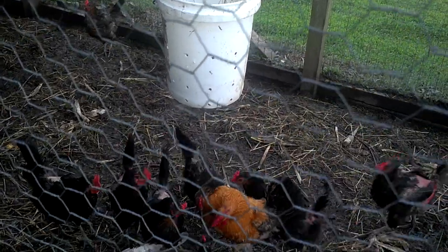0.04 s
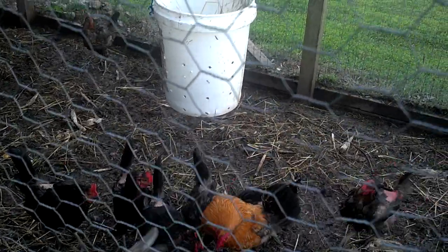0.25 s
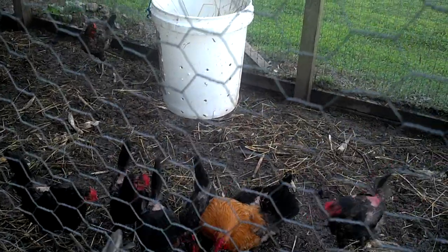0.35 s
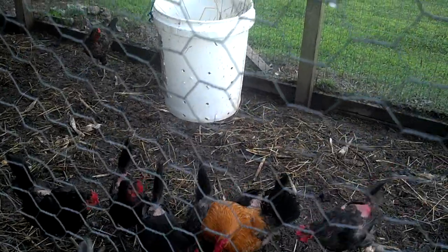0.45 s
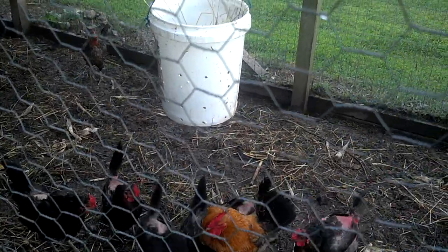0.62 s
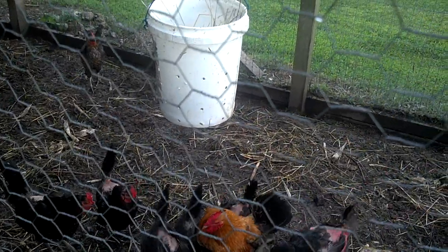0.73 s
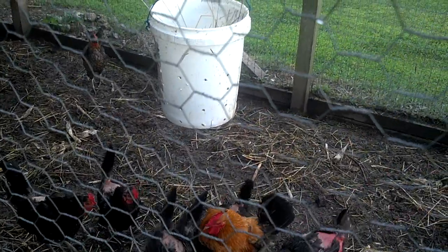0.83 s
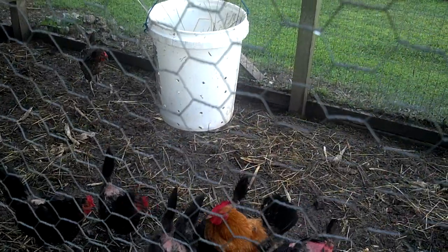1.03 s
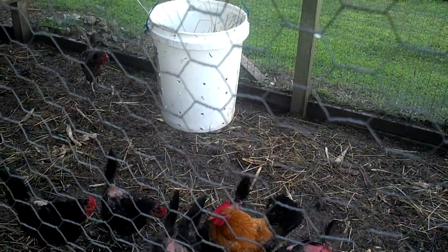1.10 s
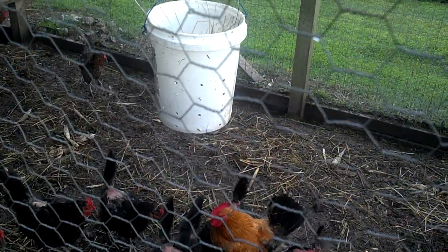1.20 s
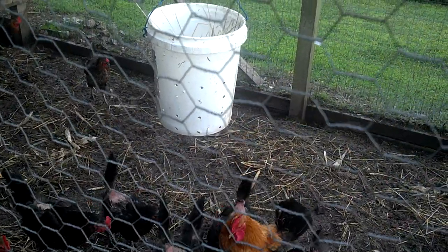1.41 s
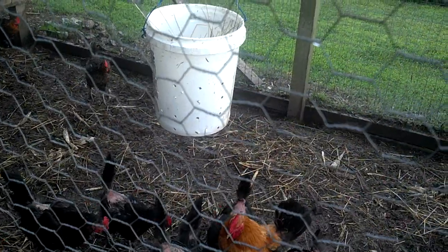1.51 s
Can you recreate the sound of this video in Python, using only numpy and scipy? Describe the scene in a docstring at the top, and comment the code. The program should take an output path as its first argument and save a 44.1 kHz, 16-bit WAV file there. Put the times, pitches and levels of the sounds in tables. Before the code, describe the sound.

Close hen clucks, brief and hoarse, with pecks, bird chirps and constant patchy outdoor noise

```python
"""Hens forage in an outdoor wire run close by, over an outdoor rush of patchy noise that never stops.
From the start: faint hoarse calls of further hens (banded noise), short swells of treble hiss (dense random
grains), pecks (noise puffs). From 0.23 s: six clucks (overtones through a beak resonance) and a bird's falling
whistles (gliding sines). At 0.64 and 1.27 s: another bird's rising chips with echoes; at 0.84 s: two soft
knocks (ringing modes). Two microphone ports hear it all; each channel is its port minus the delayed other."""
import sys
import numpy as np
from scipy import signal
from scipy.fft import rfft, irfft, next_fast_len
from scipy.io import wavfile
from scipy.ndimage import uniform_filter1d, map_coordinates

SR = 44100
rng = np.random.default_rng(int(sys.argv[2]) if len(sys.argv) > 2 else 0)


def wav_out(sig):
    """Save sig, one row per channel (or a flat mono array), as 16-bit PCM at SR to the path in sys.argv[1]."""
    wavfile.write(sys.argv[1], SR, np.round(np.clip(np.atleast_2d(sig).T, -1, 1) * 32767).astype(np.int16))


N = 68355
T = np.arange(SR // 3) / SR  # time within one event, s

# levels are set at the ports, ahead of record()
TREBLE_HZ, PATCHY_DB = 5000, 2
SWELL_S, FADE_S, FALL_FLUTTER_DB, FALL_LEAD_MS = 0.0072, .0085, 2.2, -0.051
LEAD_IN_DB, LEAD_IN_S = -15, 0.029  # a faint higher start
RISE_S, RISE_EDGE_S, RISE_FLUTTER_DB, RISE_FADE_DB_PER_S = 0.0065, .0015, 4, 600
SLAP_S, SLAP_DB = .0065, -9  # one near echo of each chip
ECHO_DB, ECHO_T60_S = -3, .21  # scattered echoes of the birds
YARD_DB, YARD_T60_S, APART_HZ = -13, 0.051, 1080  # scattered echoes of the clucks; ports differ above APART_HZ
GRAINS_PER_S, GRAIN_SCATTER_DB = 6000, 1.5
SKIRT_DB, SKIRT_HZ = -9, 5000  # bright pecks spread over all the treble
KNOCK_RISE_S, KNOCK_LEAD_MS = .002, -.24
ATTACK_S, RELEASE_T60_S = .0012, .017
SAG_PER_S = 0.98  # share of the pitch
JITTER, SHIMMER_DB = .01, 1.2
BEAK_WIDTH_HZ, HOARSE_OCTAVES = 130, 1.52
CLOSED_BOOST = 0.76  # extra fundamental while the beak is shut
RASP_HZ, RASP_OCTAVES = 7000, 1.2
TRAIL_HZ, TRAIL_OCTAVES, TRAIL_S = 729, 0.22, 0.023  # hoarse trail after a cluck
PORT_DELAY_S, BASS_LIFT_HZ, RUMBLE_CUT_HZ, TOP_HZ = 16 / 44100, 400, 78, 15750
OVERLOAD, OVERLOAD_KNEE = 0.43, 2.8  # level where a channel rounds off, and how suddenly


def amp(db):
    """Amplitude factor of a level in dB."""
    return 10 ** (np.asarray(db) / 20)


def unit(x):
    """x scaled to RMS 1."""
    return x / np.sqrt(np.mean(x ** 2) + 1e-20)


def noise():
    """White noise as long as T."""
    return rng.standard_normal(len(T))


def blank():
    """Silence at both ports, with room for event tails."""
    return np.zeros((2, N + SR))


def hump(t, length_s):
    """A half-sine swell from 0 to length_s."""
    return np.sin(np.pi * np.clip(t / length_s, 0, 1))


def filtered(x, response):
    """x times a complex response of frequency."""
    n = x.shape[-1]
    m = next_fast_len(n + 4096)
    return irfft(rfft(x, m) * response(np.fft.rfftfreq(m, 1 / SR) + 1e-3), m)[..., :n]


def band(hz, octaves):
    """A bell-shaped band on a log axis."""
    return lambda f: np.exp(-.5 * (np.log2(f / hz) / max(octaves / 2, .01)) ** 2)


def wobble(rate_hz):
    """A smooth random curve as long as T."""
    return map_coordinates(rng.standard_normal(int(rate_hz / 3) + 4), [T * rate_hz])


def add(ports, s, x, lead_ms=0):
    """Lays a sound at s; a mono one reaches the left port lead_ms before the right."""
    def lag(f):
        delay_s = (s * SR % 1 + 64) / SR + lead_ms / 2000 * np.array([[-1], [1]])
        return np.exp(-2j * np.pi * f * delay_s)
    ports[:, int(s * SR) - 64:][:, :len(T)] += filtered(x, lag) if x.ndim == 1 else x


def yard(ports, t60_s):
    """Scattered decaying echoes of energy near 1, alike at both ports in the bass."""
    common, apart = rng.standard_normal((2, len(T))) * amp(-60 * T / t60_s) * (T > .004)
    apart = filtered(apart, lambda f: 1j * f / (APART_HZ + 1j * f))
    tail = np.array([common + apart, common - apart]) / np.linalg.norm(common)
    return signal.fftconvolve(ports.mean(0)[None], tail, axes=1)[:, :ports.shape[1]]


def rush():
    """Patchy noise, part shared by the ports and part opposite in them; its treble level drifts."""
    # rush shared by both ports: f/Hz, density/dB per Hz
    shared_rush = [(45, -76), (86, -75), (130, -68), (250, -71.5), (500, -75.5), (800, -72.5),
                   (1100, -78.5), (1600, -77.5), (2100, -85), (3300, -91), (4600, -96), (6200, -96.5),
                   (7600, -101.5), (9000, -102.9), (12000, -102.3), (15500, -99.9)]
    # rush that differs between the ports: f/Hz, density/dB per Hz
    split_rush = [(45, -104.1), (86, -89.5), (130, -87.5), (250, -82), (500, -83), (800, -82), (1100, -76),
                  (1600, -78), (2100, -83.5), (3300, -92), (4600, -95), (6200, -95.5), (7600, -99.1),
                  (9000, -100.9), (12000, -102.6), (15500, -102.4)]
    # treble hiss: t/s, level/dB (only the offset from the mean counts)
    treble = [(0.0, -68), (0.15, -60), (0.276, -62.5), (0.616, -64), (0.824, -62.5), (1.082, -65.5),
              (1.55, -64)]

    z = signal.stft(rng.standard_normal((2, N + 512)), nperseg=512)[2]
    field = uniform_filter1d(rng.standard_normal(z.shape[1:]), size=8, axis=0)
    field = uniform_filter1d(field, size=8, axis=1)
    pair = unit(signal.istft(z * amp(PATCHY_DB * unit(field)), nperseg=512)[1][:, :N])

    def read(rows, f):
        hz, db = np.transpose(rows)
        return amp(np.interp(np.log(f), np.log(hz), db))

    colours = lambda f: np.array([read(shared_rush, f), read(split_rush, f)])
    common, apart = np.sqrt(SR / 2) * filtered(pair, colours)
    ports = np.array([common + apart, common - apart])
    high = filtered(ports, lambda f: 1 / (1 + (TREBLE_HZ / f) ** 4))
    db = np.interp(np.arange(N) / SR, *np.transpose(treble))
    return ports + (amp(db - db.mean()) - 1) * high


def hiss_swells():
    """Short swells of banded treble hiss, made of dense random grains."""
    # t/s, length/s, level/dB, f/Hz, width/octaves
    swells = [(0.076, 0.095, -57.5, 11100, 1), (0.225, 0.0096, -59, 11000, 1),
              (0.286, 0.092, -54.5, 13000, 0.84), (0.299, 0.084, -55.5, 7000, 0.45),
              (0.333, 0.037, -49.5, 5330, 0.57), (0.492, 0.045, -55.5, 7700, 1),
              (0.86, 0.063, -51.5, 12670, 0.47), (0.583, .03, -52, 11700, 0.067),
              (0.692, 0.07, -59.5, 7000, 0.34), (0.917, 0.049, -47.5, 7000, 0.74),
              (0.987, 0.043, -58, 7000, .5)]
    out, size = blank(), (2, len(T))
    for s, length_s, db, hz, octaves in swells:
        hits = rng.random(size) < GRAINS_PER_S / SR
        scatter = amp(GRAIN_SCATTER_DB * rng.exponential(size=size))
        grains = hits * rng.standard_normal(size) * scatter
        add(out, s, amp(db) * unit(filtered(grains, band(hz, octaves))) * hump(T, length_s))
    return out


def far_calls():
    """Faint hoarse calls of hens further off: banded noise under a swell."""
    # t/s, length/s, f/Hz, width/Hz, level/dB
    calls = [(.06, 0.035, 185, 40, -43.5), (0.608, 0.092, 870, 120, -43), (0.836, 0.13, 1600, 322, -42),
             (.88, 0.035, 2130, 260, -47), (1.021, 0.063, 1530, 300, -51), (1.289, 0.057, 724, 102, -44),
             (1.417, 0.062, 840, 120, -49)]
    out = blank()
    for s, length_s, hz, width_hz, db in calls:
        hoarse = filtered(noise(), lambda f: np.exp(-2 * ((f - hz) / width_hz) ** 2))
        add(out, s, amp(db) * unit(hoarse) * hump(T, length_s), .1)
    return out


def falling_whistles():
    """A sine whose pitch falls linearly, under a swell and a fade."""
    # peak t/s, level/dB, f at peak/Hz, fall/Hz per s
    falls = [(0.269, -42, 3590, 22700), (.600, -41, 3614, 28500), (0.859, -42, 3544, 30200),
             (1.104, -41, 3550, 33700), (1.353, -41.5, 3560, 29500)]
    out, u = blank(), T - .05  # u: time from the peak, s
    lead_in = amp(LEAD_IN_DB) * np.exp(-(u / LEAD_IN_S) ** 6)
    swell = np.maximum(1 / np.cosh(u / SWELL_S), lead_in)
    shape = np.where(u < 0, swell, np.exp(-(u / FADE_S) ** 4)) * np.minimum(T / .01, 1)
    for s, db, hz, hz_per_s in falls:
        whistle = np.sin(2 * np.pi * (hz * u - hz_per_s * u * u / 2))
        add(out, s - .05, amp(db + FALL_FLUTTER_DB * wobble(143.5)) * shape * whistle, FALL_LEAD_MS)
    return out


def rising_chips():
    """A quick sine whose pitch rises and levels off, each with one near echo."""
    # t/s, level/dB, from f/Hz, to f/Hz, length/s
    rises = [(.6398, -39.5, 6200, 8150, 0.014), (1.269, -33.5, 6260, 7850, 0.018)]
    out = blank()
    for s, db, from_hz, to_hz, length_s in rises:
        pitch_hz = to_hz + (from_hz - to_hz) * np.exp(-(T / RISE_S) ** 3)
        edges = np.clip(np.minimum(T, length_s - T) / RISE_EDGE_S, 0, 1)
        shape = edges * amp(RISE_FLUTTER_DB * wobble(284) - RISE_FADE_DB_PER_S * T)
        chip = amp(db) * shape * np.sin(2 * np.pi * np.cumsum(pitch_hz) / SR)
        add(out, s, chip, .03)
        add(out, s + SLAP_S, amp(SLAP_DB) * chip, -.03)
    return out


def birds():
    """One bird whistles, another chips; scattered echoes follow, the whistles feeding them at half."""
    falls, chips = falling_whistles(), rising_chips()
    return falls + chips + amp(ECHO_DB) * yard(chips + falls / 2, ECHO_T60_S)


def pecks():
    """Pecks and ticks: decaying puffs of banded noise."""
    # t/s, RMS level at onset/dB, f/Hz, width/octaves, t60/s, left lead/ms
    puffs = [(.1411, -40.5, 8800, 4, 0.047, 0), (.186, -48, 10000, .6, 0.008, 0),
             (0.227, -48, 9100, 2.2, .02, 0.16), (.2932, -37, 6900, 0.29, 0.013, 0),
             (.4309, -36.5, 14000, 0.33, 0.008, -0.086), (0.587, -40, 9000, 2, 0.028, 0.094),
             (.6838, -31.5, 7000, 0.26, 0.022, 0.038), (.6865, -39, 7000, 0.33, 0.027, 0),
             (.689, -44.5, 10000, 3.2, .03, 0), (.684, -42.5, 4900, 0.36, 0.022, 0.031),
             (.705, -57, 7000, .3, .012, 0), (1.011, -49.5, 7000, 0.82, 0.009, 0),
             (1.086, -58, 7860, 0.45, 0.012, 0), (1.115, -57, 7800, .5, .01, 0),
             (1.3, -38, 3880, 0.6, 0.011, 0), (1.32, -46, 3500, .4, 0.017, 0),
             (1.502, -53.5, 13000, 0.47, 0.0075, 0)]
    out = blank()
    for s, db, hz, octaves, t60_s, lead_ms in puffs:
        skirt = lambda f: (hz > SKIRT_HZ) * amp(SKIRT_DB) / (1 + (SKIRT_HZ / f) ** 4)
        puff = unit(filtered(noise(), lambda f: band(hz, octaves)(f) + skirt(f)))
        add(out, s, amp(db - 60 * T / t60_s) * puff, lead_ms)
    return out


def knocks():
    """Soft knocks close by: a dull body rings briefly in decaying modes."""
    # t/s, level/dB
    blows = [(0.8389, -20), (0.8455, -11)]
    # f/Hz, level re blow/dB, t60/s
    modes = [(336, 1.5, 0.029), (171, -8, 0.047)]
    out = blank()
    ring = sum(amp(db - 60 * T / t60_s) * np.cos(2 * np.pi * hz * T) for hz, db, t60_s in modes)
    rise = 1 - np.exp(-(T / KNOCK_RISE_S) ** 2)
    for s, db in blows:
        add(out, s, amp(db) * rise * ring, KNOCK_LEAD_MS)
    return out


def clucks():
    """A voice starts sharp and sags; the beak resonance opens after the start; a hoarse trail follows."""
    # t/s, held/s, f/Hz, level/dB, sharp start/share of f, step per overtone/dB, beak f/Hz, beak gain/dB,
    # half-pitch depth/share, hoarse noise re voice/dB, treble rasp/dB, left lead/ms, pitch settles/s,
    # beak opens/s, hoarse trail/dB (rasp and trail re level)
    calls = [(0.2251, 0.014, 336.3, -35, 0.08, -1.06, 707, 9.5, 0.18, -2, -13.5, 0.2, 0.0049, 0.00064, -3.5),
             (.372, .012, 376.8, -29, 0.338, -2.5, 1118, 12, 0.13, -9.5, -26, 0.17, 0.00353, 0.0037, -7),
             (0.584, 0.015, 391.8, -26, 0.59, -4, 1187, 18, 0.045, -6.5, -18.5, 0.1604, 0.00514, 0.0032, -5.5),
             (0.8141, 0.014, 475.3, -26.5, 0.023, -17.5, 1377, 34.5, 0.32, -17.5, -34, 0.29, 0.0047, 0.0011, -8.5),
             (.978, 0.019, 500.5, -27, 0.15, -7.5, 920, -8, 0.071, -29, -43, 0.26, 0.0056, 0.0025, -16),
             (1.192, 0.018, 481, -30.5, 0.057, -31, 1010, 11, 0.15, -14, -47, 0.37, 0.002, 0.0038, -13)]
    out = blank()
    for (s, held_s, hz, db, sharp, step_db, beak_hz, beak_db, half, hoarse_db, rasp_db, lead_ms,
         settle_s, opening_s, trail_db) in calls:
        start = sharp * np.exp(-(T / settle_s) ** 4)
        sag = SAG_PER_S * np.minimum(T - held_s / 2, .05)
        pitch_hz = hz * (1 + start - sag + JITTER * wobble(363))
        phase = 2 * np.pi * np.cumsum(pitch_hz) / SR
        opens = 1 - np.exp(-(T / opening_s) ** 2)

        voice = 0
        for k in range(9):  # k = 0 is the fundamental
            beak = beak_db * opens / (1 + (((k + 1) * pitch_hz - beak_hz) / BEAK_WIDTH_HZ) ** 2)
            level = amp(step_db * k + SHIMMER_DB * wobble(374) + beak)
            gate = opens if k else 1 + CLOSED_BOOST * (1 - opens)
            voice = voice + level * gate * np.sin((k + 1) * phase + rng.uniform(0, 2 * np.pi) * (k > 0))
        voice = voice * (1 + half * np.cos(phase / 2))
        voice = voice + amp(hoarse_db) * unit(filtered(noise(), band(beak_hz, HOARSE_OCTAVES)))

        rasp = unit(filtered(noise() * (1 + np.cos(phase)), band(RASP_HZ, RASP_OCTAVES)))
        trail = unit(filtered(noise(), band(TRAIL_HZ, TRAIL_OCTAVES))) * hump(T - held_s, TRAIL_S)
        shape = np.minimum(T / ATTACK_S, 1) * amp(-60 * np.maximum(T - held_s, 0) / RELEASE_T60_S)
        cluck = shape * (np.sqrt(2) * voice + amp(rasp_db) * rasp) + amp(trail_db) * trail

        one = np.zeros((2, 2 * len(T)))
        add(one, 64 / SR, amp(db) * cluck, lead_ms)
        add(out, s, (one + amp(YARD_DB) * yard(one, YARD_T60_S))[:, :len(T)])
    return out


def scene():
    """All sources summed at the two ports."""
    events = hiss_swells() + far_calls() + birds() + pecks() + knocks() + clucks()
    return rush() + events[:, :N]


def record(dry):
    """Port minus delayed other port; lost bass lifted, rumble cut, loud peaks rounded, top cut."""
    dry = np.pad(dry, ((0, 0), (4096, 0)), "reflect")  # run-in for the filters
    late = filtered(dry[::-1], lambda f: np.exp(-2j * np.pi * f * PORT_DELAY_S))

    def low(f):
        lift = 1 + BASS_LIFT_HZ / (1j * f)
        return lift / (1 + RUMBLE_CUT_HZ / (1j * f) - (RUMBLE_CUT_HZ / f) ** 2) ** 3

    def top(f):  # a 14 dB step, then a slope, then nothing
        return np.where(f < TOP_HZ, 1, amp(-14 - .035 * (f - TOP_HZ)) * (f < 16650))

    wired = filtered((dry - late) / 2, low)
    rounded = wired / (1 + np.abs(wired / OVERLOAD) ** OVERLOAD_KNEE) ** (1 / OVERLOAD_KNEE)
    return filtered(rounded, top)[:, 4096:]


dry = scene()
out = record(dry)
wav_out(out)
```